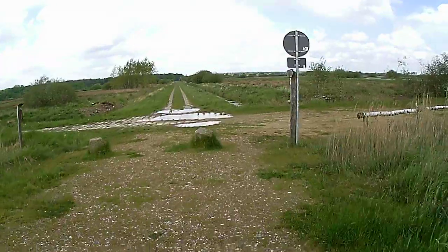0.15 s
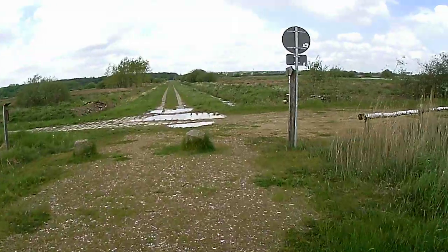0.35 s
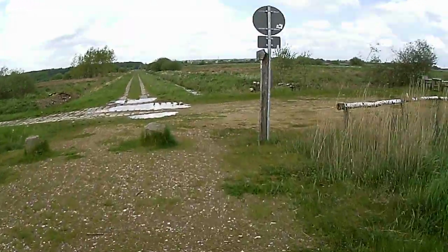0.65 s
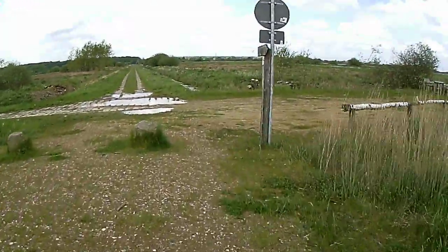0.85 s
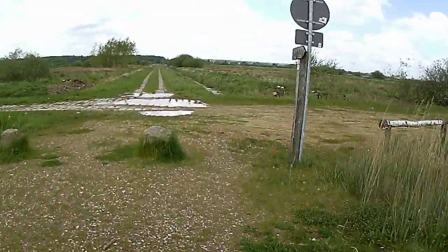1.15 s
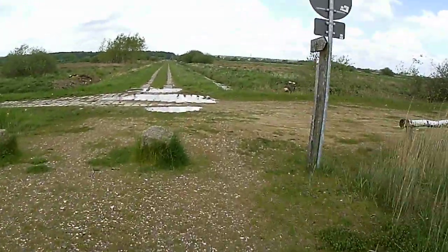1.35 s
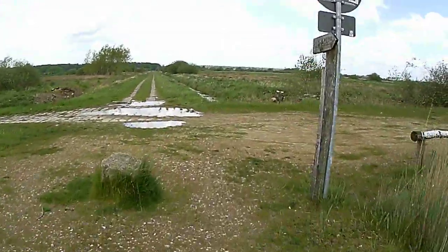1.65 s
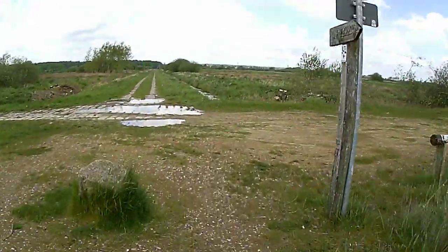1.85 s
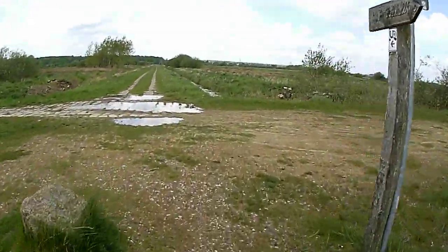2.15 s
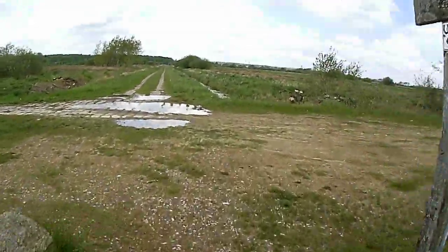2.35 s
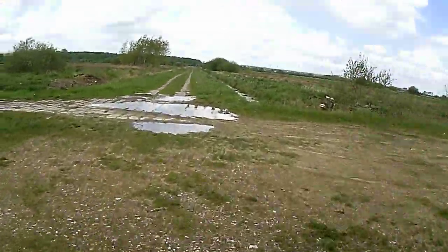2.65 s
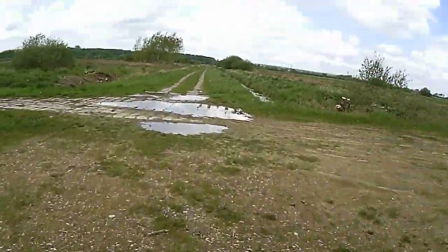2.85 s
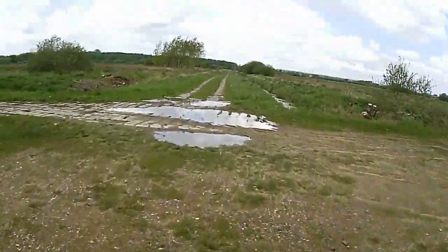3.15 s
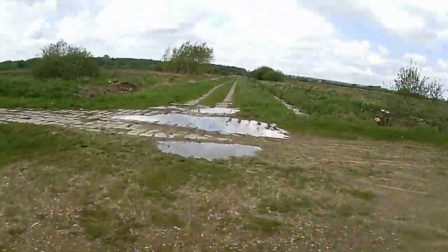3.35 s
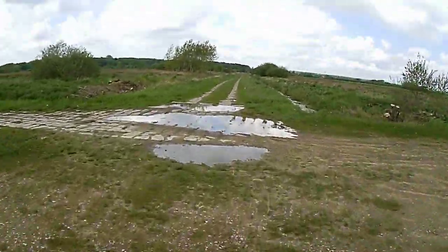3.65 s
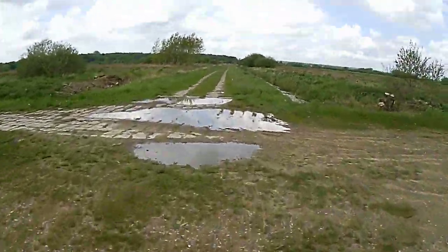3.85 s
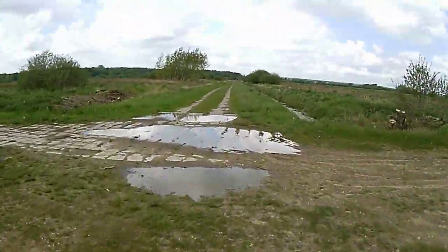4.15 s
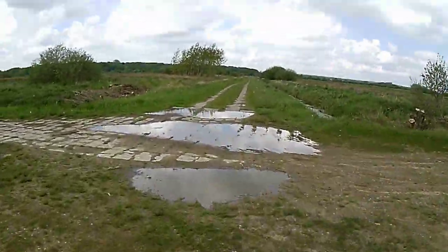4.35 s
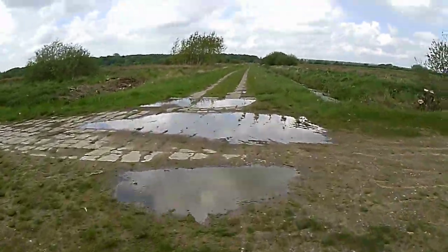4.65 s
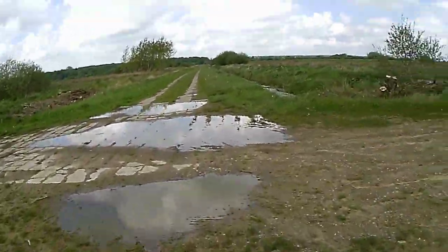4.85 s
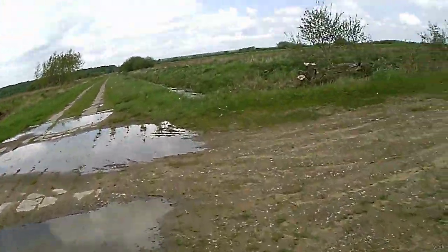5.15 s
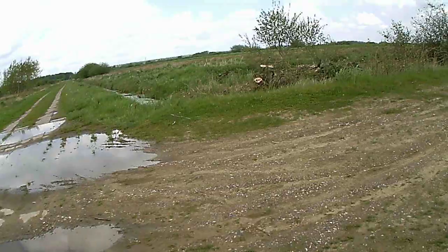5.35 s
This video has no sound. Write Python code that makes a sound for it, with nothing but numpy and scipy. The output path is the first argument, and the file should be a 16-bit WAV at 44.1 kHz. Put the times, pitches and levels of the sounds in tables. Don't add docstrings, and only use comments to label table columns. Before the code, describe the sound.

From 0 to 1.4 s a bicycle rolls on gravel: a strong uneven hum near 65-70 Hz swells with each bump, over quiet gritty tyre crunch, with clamp creaks, sharp metallic grit ticks and duller stone snaps, densest around 0.8-1.2 s. A rough pad drag creeps in after 1.1 s. At about 1.45 s the brake grabs: a loud, buzzing squeal near 1 kHz, chopped into irregular short grips and longer cries around 1.8, 2.35 and 2.5-2.7 s, dipping briefly in pitch near 1.9 and 2.1 s. Dull knocks and bright clacks chatter rapidly, especially 2.15-2.35 s. Grips continue to 3.45 s, then become short chirps and swells, clustered at 3.8-4.2 and 4.4-4.5 s, weak after 4.75 s and gone by about 5.3 s. Rattles and hum persist to 5.5 s; low wind buffets stand out near 3.95 and 5.2 s. Close, dry, overloaded outdoor sound.

```python
import sys
import numpy as np
from scipy import signal
from scipy.fft import rfft, irfft
from scipy.io import wavfile
from scipy.ndimage import uniform_filter1d

SR = 44100
rng = np.random.default_rng(int(sys.argv[2]) if len(sys.argv) > 2 else 0)


def how_loud(loudness_db):
    steps = np.asarray(loudness_db, float) / 20
    return 10 ** steps


def unload_audio(sound):
    columns = np.transpose(np.atleast_2d(sound))
    steps = np.round(np.clip(columns, -1, 1) * 32767)
    wavfile.write(sys.argv[1], SR, steps.astype(np.int16))


N = 242991
T = np.arange(N) / SR

# widest swing in seconds, level in dB, length in seconds.
BUMPS = [(.09, -17.5, 0.22), (.31, -17, 0.22), (.46, -16, .12), (.62, -18, 0.17), (.73, -15, 0.13),
         (.88, -19, .18), (1.02, -16.5, 0.18), (1.16, -21.5, 0.21), (1.3, -21.5, 0.16), (1.43, -19, 0.16),
         (1.55, -21.5, 0.18), (1.78, -20.5, 0.2), (2.03, -19.5, 0.091), (2.28, -17, 0.32),
         (2.85, -29, 0.15), (3.22, -20.5, 0.071), (3.45, -22.5, 0.13), (3.6, -17.5, 0.044),
         (3.7, -23, 0.26), (3.82, -20, 0.24), (4.33, -20.5, 0.33), (4.68, -27, 0.12), (4.78, -23.5, 0.11),
         (4.93, -20, 0.26), (5.18, -23.5, 0.2), (5.37, -19.5, 0.29), (5.49, -21, 0.25)]
# peak in seconds, level in dB, length in seconds.
GUSTS = [(0.01, -26.5, 0.045), (.62, -37.5, 0.36), (.77, -31.5, 0.1), (1.2, -31, 0.052), (1.8, -51, 0.22),
         (2.27, -36, 0.24), (2.75, -48, 0.51), (3.6, -32, 0.5), (3.95, -26, 0.34), (4.4, -33.5, 0.18),
         (4.75, -39, 0.19), (5.17, -22, 0.39), (5.31, -25.5, 0.21), (5.47, -33.5, 0.11)]
# frequency in Hz, density in dB per Hz.
WIND_COLOUR = [(53, -29.5), (90, -5.5), (184, 2.5), (290, -1.5), (446, -9), (800, -20), (1040, -48.5),
               (1760, -120)]
# time in seconds, level in dB.
LOAD = [(0, -51.5), (.25, -57.5), (.8, -51.5), (1.4, -51.5), (2.1, -46.5), (3.0, -50), (4.4, -48),
        (4.9, -50.5), (5.2, -50.5), (5.51, -50)]
# frequency in Hz, density in dB per Hz.
TYRE_COLOUR = [(240, -37), (400, 1.5), (839, 6), (1900, -5), (2180, -16.5), (2930, -8.5), (3750, -20.5),
               (6000, -27.5), (16000, -61)]
# centre in Hz, width in Hz, level in dB.
WHINE = [(8400, 60, -82), (9550, 60, -73)]
# start in seconds, peak in dB.
CREAKS = [(.0235, -29.5), (.053, -26), (.071, -33), (.107, -41), (.195, -49), (.302, -40), (.316, -32),
          (.34, -40), (.441, -44), (.455, -27), (.478, -45), (.535, -51), (.585, -30.5), (.616, -37),
          (.637, -40), (.751, -43), (.805, -49), (.847, -35), (.884, -51), (.958, -56), (.9955, -18),
          (1.113, -34), (1.25, -27.5), (1.369, -33)]
# frequency in Hz, density in dB per Hz.
CREAK_COLOUR = [(500, -30), (1500, 4), (2300, -3.5), (3000, 5.5), (3800, -6), (4800, -5.5), (7000, -11.5),
                (10000, -22)]
# start in seconds, peak in dB.
TICKS = [(0.159, -21), (0.2657, -17), (0.315, -43), (0.5498, -19.5), (0.6942, -38), (0.7845, -18),
         (0.818, -19.5), (0.8543, -17), (0.9134, -20.5), (0.9997, -16), (1.041, -28), (1.0588, -21.5),
         (1.1228, -27), (1.1479, -22), (1.1902, -24.5), (1.2664, -34.5), (1.3138, -35), (1.4064, -36)]
# frequency in Hz, width in Hz, level in dB.
TUBE = [(1640, 156, 1.5), (2900, 530, -3.5), (4070, 140, -9), (4780, 160, -3), (5160, 230, -14),
        (6670, 800, 0.5), (8150, 280, -16), (9500, 360, -1.5), (10600, 510, -6), (12400, 410, -5),
        (13700, 460, -24), (14700, 400, -25)]
# start in seconds, peak in dB, pitch in Hz.
STONES = [(0.16, -40, 1520), (0.267, -29.5, 1230), (0.549, -36, 1190), (0.696, -25, 840), (0.752, -46, 657),
          (0.772, -22, 834), (0.836, -37, 1945), (0.854, -28, 810), (0.889, -29.5, 1840),
          (0.904, -31, 1940), (0.976, -28.5, 2900), (1.198, -29, 2320), (0.975, -23, 650),
          (0.992, -18.5, 930), (1.145, -35, 1230), (1.194, -21, 840)]
# start in seconds, peak in dB, pitch in Hz.
THUMPS = [
    (.55, -36, 524),
    (0.773, -23, 287),
    (1.195, -33.5, 307),
    (2.859, -36, 319.3),
]
# centre in Hz,
# width in Hz, level in dB.
PAD = [(1720, 325, 6.5), (2443, 220, 1), (4780, 170, -17.5), (9500, 200, -21), (10400, 500, -20.5)]
# frequency in Hz, width in Hz, level in dB.
JOINT = [(3080, 280, -6), (3480, 190, 2), (4600, 500, -12), (5150, 330, -6), (7750, 600, -7)]
# time in seconds, level in dB.
SCRAPE = [(1.44, -46.5), (1.47, -22.5), (2.3, -28), (2.8, -28.5), (3.1, -25.5), (3.73, -33.5), (4.0, -33.5),
          (4.2, -33), (4.4, -33), (4.65, -36), (5.0, -37.5), (5.2, -41), (5.3, -63.5)]
# start and length in seconds, level in dB,
# rise over the grip in dB, pitch in Hz.
GRIPS = [(1.448, 0.024, -18, 9, 1076), (1.462, 0.025, -7, 5.5, 1008), (1.497, 0.012, -18, -2.5, 1087),
         (1.526, 0.0089, -24, 1, 1092), (1.536, 0.036, -14.5, -7.5, 1102), (1.567, 0.079, -5, 7, 1006),
         (1.667, 0.012, -12.5, 6, 1001), (1.688, 0.02, -10.5, -4.5, 1065), (1.711, 0.022, -7.5, -3, 1014),
         (1.741, 0.022, -12, -1.5, 1039), (1.768, 0.015, -15.5, -3.5, 1062), (1.788, 0.12, -1.5, 9.5, 999),
         (1.938, 0.0062, -16, -1.5, 1070), (1.952, 0.011, -21, -2, 1083), (1.975, 0.016, -18.5, 5.5, 1061),
         (1.998, 0.012, -11.5, 2, 1067), (2.018, 0.011, -14, 1.5, 1030), (2.036, 0.016, -2, -0.5, 983),
         (2.062, 0.064, -9, -2, 999), (2.139, 0.047, -8, 7, 1005), (2.196, 0.026, -13, -6.5, 1013),
         (2.281, 0.025, -20.5, -0.5, 1066), (2.339, 0.11, -5, 6.5, 998.4), (2.451, 0.049, -14.5, -8, 1008),
         (2.489, .22, -5, 4, 994.7), (2.715, 0.021, -14.5, -4, 993.5), (2.845, .03, -9, 2, 998),
         (2.878, 0.072, -10.5, -1, 995), (2.952, 0.024, -10, 4.5, 977.5), (2.978, 0.04, -11, -3, 1002),
         (3.02, 0.019, -11.5, 2.5, 992), (3.086, 0.017, -22, -2.5, 1030), (3.118, 0.031, -23, -7, 1066),
         (3.193, 0.055, -8.5, 3.5, 1001), (3.25, 0.056, -14.5, 1, 1015), (3.302, 0.048, -15.5, 4.5, 1009),
         (3.353, 0.049, -10, -1, 999), (3.406, 0.031, -10.5, -11.5, 996), (3.434, 0.018, -22.5, -4.5, 1012)]
# start, rise and fall in seconds,
# peak in dB, pitch in Hz.
BRUSHES = [(3.465, 0.026, 0.032, -12.5, 1022), (3.501, 0.0358, 0.0419, -7.5, 1028),
           (3.6, 0.012, 0.0358, -12.5, 1013), (3.762, 0.024, 0.019, -26, 1027),
           (3.815, 0.017, 0.013, -8.5, 999), (3.832, .012, 0.011, -7.5, 1017), (3.851, .01, .014, -7, 1010),
           (3.868, 0.017, .012, -7, 1013), (3.895, 0.024, 0.0096, -14.5, 1032),
           (3.926, .012, 0.0099, -12, 1013), (3.96, 0.0087, 0.0062, -22.5, 1000),
           (3.985, 0.013, 0.017, -29, 1076), (4.049, .007, 0.013, -19, 1078),
           (4.026, 0.011, 0.0055, -12, 1050), (4.088, 0.024, 0.013, -14.5, 1040),
           (4.127, 0.017, 0.033, -6, 1023), (4.174, 0.013, .012, -12.5, 1031),
           (4.424, .008, 0.012, -10, 1025), (4.44, .014, 0.03, -6, 1022), (4.478, 0.013, 0.014, -12, 1021),
           (4.21, 0.012, 0.027, -26, 1036), (4.33, 0.013, 0.029, -31, 1048),
           (4.511, 0.0088, 0.045, -14, 1025), (4.56, 0.0086, 0.044, -24.5, 1042),
           (4.653, 0.0085, 0.013, -23.5, 1028), (4.82, 0.0093, 0.0054, -27.5, 1035),
           (4.721, 0.026, 0.0759, -10, 1023), (4.846, 0.011, 0.055, -24, 1044),
           (4.912, 0.0098, 0.0071, -23, 1004), (5.018, 0.008, 0.022, -23, 1060),
           (5.05, 0.0073, .015, -29.5, 1050), (5.102, 0.0076, 0.015, -26.5, 1059),
           (5.122, 0.041, 0.033, -19, 1049), (5.19, 0.0065, .03, -33, 1050)]
# centre in seconds,
# low mode in dB, sag in Hz, spread in seconds.
BITES = [
    (1.646, -26, 14.3, 0.021),
    (1.911, -13.5, 70.7, 0.015),
    (2.087, -43, 49.5, 0.019),
    (2.462, -32, 7.33, 0.0431),
    (2.726, -23.5, 8.7, 0.025),
]
# level in dB, growth as a power of the swing.
BUZZ = [(-18, 1.19), (-23.5, 1.026), (-26, 2.86), (-28.5, 1.4), (-33.5, 2.3), (-39, 1.9)]
# frequency in Hz, density in dB per Hz.
RUB_COLOUR = [(1200, -34.5), (2500, 8), (4000, 11), (6000, -9), (9000, -41), (12000, -45.5), (16000, -79)]
# time in seconds, peak in dB.
UPPER = [(1.5958, -3), (1.684, -8), (1.7062, -13), (1.7385, -5.5), (1.7523, -10), (1.7669, 0), (1.7841, 2),
         (1.8117, 1), (1.857, -4), (1.9671, -14), (2.0196, -2), (2.0321, -7.5), (2.1531, -3),
         (2.1695, -1.5), (2.2, -5), (2.2142, 2), (2.2309, 5.5), (2.2447, 2), (2.2591, -3), (2.2741, 4.5),
         (2.2901, 1.5), (2.3038, 3), (2.3207, 0.5), (2.3339, -1), (2.346, -18), (2.3633, -1), (2.3758, -8),
         (2.4545, -3.5), (2.467, -9), (2.479, -8), (2.5, -5), (2.515, -9), (2.528, -10), (2.5412, -12),
         (2.5696, -2.5), (2.5857, -3.5), (2.6, -5), (2.6147, -4), (2.627, -5), (2.6406, -6), (2.7, -11),
         (2.7745, -16)]
# time in seconds, peak in dB.
UPPER_MIDDLE = [(2.863, 5), (2.8886, -12), (2.9029, -15), (2.934, -1.5), (2.961, -14), (2.979, -11),
                (3.0397, -15.5), (3.1279, -22), (3.2392, -15), (3.259, -13), (3.2876, -15), (3.3276, -4),
                (3.367, -3), (3.3828, -5), (3.3944, -6), (3.4118, 3), (3.4262, -8), (3.4412, -2),
                (3.4544, -5.5), (3.4692, -2), (3.5282, -14), (3.5927, -11), (3.6076, -7), (3.6206, -7.5),
                (3.638, -15), (3.651, -16), (3.6672, -30), (3.745, -7), (3.7585, -8), (3.7741, -3),
                (3.7875, -12), (3.833, -5)]
# time in seconds, peak in dB.
UPPER_LATE = [(3.935, -13.5), (4.1387, -11), (4.154, -13), (4.2, -15.5), (4.233, -14), (4.245, -13),
              (4.2598, 1), (4.2761, -4), (4.3058, -6), (4.32, -8), (4.3349, -6), (4.3489, -16),
              (4.363, -11), (4.3919, -6), (4.43, -17), (4.5347, -9), (4.742, -12.5), (4.8435, -14),
              (4.8582, -6), (4.878, -11), (4.8922, -15), (4.9085, -15), (4.921, -5.5), (4.9355, -12),
              (4.951, -7.5), (4.98, -16), (5.1633, -14), (5.3046, -14.5), (5.334, -8), (5.379, -11),
              (5.4, -5.5), (5.41, -16), (5.431, -14), (5.4695, -14.5)]
# time in seconds, peak in dB.
LOWER = [(1.4692, -7), (1.4849, 2), (1.5054, -23), (1.5173, -5.5), (1.53, -14), (1.573, -9), (1.5893, -1.5),
         (1.7603, -4.5), (1.7765, -5), (1.8799, -13), (1.898, -10), (2.0403, -13), (2.1015, -13),
         (2.1097, -10), (2.1618, -6), (2.1812, -11), (2.189, -7), (2.192, -6), (2.2068, -2), (2.221, -5),
         (2.2363, -6), (2.2539, 1), (2.2696, -2), (2.2819, -12), (2.2957, -15), (2.313, -1), (2.3272, -1),
         (2.371, -8), (2.4169, -3.5), (2.652, -7), (2.7093, -0.5), (2.7832, -21), (2.9138, -15),
         (2.922, -14), (2.9278, -3.5), (2.9715, -8.5), (3.206, -20), (3.2673, -6), (3.3181, -8),
         (3.345, -8.5), (3.3883, -3), (3.4034, -4), (3.4303, -6), (3.4622, -5.5)]
# time in seconds, peak in dB.
LOWER_LATE = [(3.6758, -21), (3.725, -13), (3.7381, -24), (3.769, -6), (3.7826, -9), (3.8281, -11.5),
              (3.8737, -4.5), (4.038, -21), (4.2523, -7), (4.2674, 3.5), (4.3137, -8), (4.331, -15),
              (4.3413, -17), (4.355, -11), (4.3711, -17), (4.3872, -1.5), (4.4015, -9), (4.4075, -14),
              (4.4505, -14.5), (4.6724, -12), (4.686, -8), (4.7668, -12), (4.781, -12), (4.7941, -8.5),
              (4.8519, -2.5), (4.8702, -6), (4.8831, 0), (4.8987, -9), (4.9158, -4), (4.9294, -10),
              (4.986, -19), (5.1548, -16), (5.325, -4), (5.3553, -16), (5.3712, -7.5), (5.3882, -2)]
UPPER_TILT_DB = [-4.5, 1, 0.5, -10, -7]
LOWER_TILT_DB = [2, -0.5, 7, 7.5, 1.5]


def evened(x):
    return x / np.sqrt(np.mean(x ** 2) + 1e-20)


def curves(rows, t):
    s, *columns = np.transpose(rows)
    return [np.interp(t, s, c) for c in columns]


def coloured(x, points):
    f, db = np.transpose(points)
    hz = np.fft.rfftfreq(len(x), 1 / SR)
    gain = how_loud(np.interp(np.log(hz + 1), np.log(f + 1), db))
    return evened(irfft(rfft(x) * gain, len(x)))


def wobble(hz, size=N):
    return evened(signal.lfilter(*signal.butter(2, 2 * hz / SR), rng.standard_normal(size)))


def resonate(x, hz, width):
    turn = np.exp(2j * np.pi * np.cumsum(hz * np.ones(len(x))) / SR)
    r = np.exp(-np.pi * width / SR)
    return 2 * (turn * signal.lfilter([1 - r], [1, -r], x / turn + 1e-18)).real


def noise_band(hz, width):
    first, second = np.broadcast_to(width, 2)
    return evened(resonate(resonate(rng.standard_normal(N), hz, first), hz, second))


def place(events, sounds):
    out = np.zeros(N)
    for (s, db, *_), sound in zip(events, sounds):
        part = out[round(s * SR):][:len(sound)]
        part += how_loud(db) * sound[:len(part)] / abs(sound).max()
    return out


def swells(rows, rest_db):
    power = how_loud(2 * rest_db)
    for s, db, length in rows:
        power = power + how_loud(2 * db) * np.cos(np.pi * np.clip((T - s) / length, -.5, .5)) ** 2
    return 10 * np.log10(power)


def paced(turns):
    upper_turn, lower_turn, firm_db = -.07, .44, -14
    stops = [(s, upper_turn) for s, db in UPPER + UPPER_MIDDLE + UPPER_LATE if db > firm_db]
    stops += [(s, lower_turn) for s, db in LOWER + LOWER_LATE if db > firm_db]
    nudges = [(0, 0)]
    for s, turn in sorted(stops):
        last_s, last_nudge = nudges[-1]
        miss = (turn - turns[round(s * SR)] - last_nudge + .5) % 1 - .5
        if abs(miss) < 25 * (s - last_s):
            nudges.append((s, last_nudge + miss))
    return turns + uniform_filter1d(curves(nudges, T)[0], size=200)


def mount():
    rest_db, rest_hz, sag_hz_per_db = -29.5, 68.8, 0.19
    db = swells(BUMPS, rest_db)
    hz = rest_hz - sag_hz_per_db * (db - rest_db)
    turns = paced(np.cumsum(hz + 4.64 * wobble(18.0)) / SR)
    swing = np.sqrt(2) * np.sin(2 * np.pi * turns)
    jolts = noise_band(hz, (23.0, 31.0))
    hum = how_loud(db) * (0.77 * swing * how_loud(1.3 * wobble(21.0)) + 0.23 * jolts)
    sway = how_loud(-30.5) * evened(resonate(resonate(rng.standard_normal(N), 61.3, 36.0), 40., 80.))

    strain = np.clip(abs(hum) / 0.35, 0, 1) ** 2.0
    sizes = how_loud(1.2 * np.minimum(rng.exponential(1, N), 3))
    snaps = rng.standard_normal(N) * sizes * (rng.random(N) < 700. * strain / SR)
    burst = np.exp(-np.arange(40) / 20.0) * rng.standard_normal(40)
    creak = coloured(np.convolve(snaps, burst)[:N], CREAK_COLOUR)
    return hum + sway + how_loud(-59) * creak


def wind():
    gust_db = swells(GUSTS, -39.5)
    gusts = coloured(rng.standard_normal(N), WIND_COLOUR) * how_loud(gust_db - 3.0 + 1.86 * wobble(27.0))
    return gusts + 3.0 * (gusts ** 2 - uniform_filter1d(gusts ** 2, size=1000))


def tyre():
    sizes = how_loud(2.8 * np.minimum(rng.exponential(1, N), 5))
    grains = rng.choice([-1., 1.], N) * sizes * (rng.random(N) < 2200. / SR)
    crush = coloured(evened(grains) + 0.53 * rng.standard_normal(N), TYRE_COLOUR)
    return crush * how_loud(curves(LOAD, T)[0] + 7.5 + 4.03 * wobble(18.0))


def hiss():
    white = rng.standard_normal(N)
    bands = sum(how_loud(db) * evened(resonate(white, hz, width)) for hz, width, db in WHINE)
    return how_loud(-65.0) * coloured(white, [(0, 1), (14000, -5), (15200, -2.5), (22050, -12)]) + bands


def creaks():
    t = np.arange(700) / SR
    chances = rng.standard_normal((len(CREAKS), 700))
    return place(CREAKS, [coloured(c, CREAK_COLOUR) * np.exp(-t / 0.0018) for c in chances])


def ticks():
    t = np.arange(700) / SR
    sounds = []
    for chance in rng.standard_normal((len(TICKS), 700)):
        blow = (t == 0) + .035 * chance * np.exp(-t / 0.0016)
        modes = [how_loud(db) * resonate(blow, hz, width) / np.sqrt(width) for hz, width, db in TUBE]
        sounds.append(sum(modes))
    return how_loud(7.0) * place(TICKS, sounds)


def stones():
    t = np.arange(700) / SR
    sounds = []
    for chance, (_, _, hz) in zip(rng.standard_normal((len(STONES), 700)), STONES):
        snap = chance * t * np.exp(-t / 0.0021)
        sounds.append(resonate(resonate(snap, hz, 1100.0), hz, 1400.0))
    return how_loud(-1.0) * place(STONES, sounds)


def thumps():
    t = np.arange(2500) / SR
    return place(THUMPS, [np.sin(2 * np.pi * hz * t) * t * np.exp(-t / 0.008) for *_, hz in THUMPS])


def dragging_pad():
    drag = sum(how_loud(db) * noise_band(hz, width) for hz, width, db in PAD)
    return how_loud(curves(LOAD, T)[0]) * np.clip((T - 1.08) / 0.29, 0, 1) * drag


def joint(x, spread_db):
    return sum(how_loud(db + extra_db) * resonate(x, hz, width) / np.sqrt(width)
               for (hz, width, db), extra_db in zip(JOINT, spread_db))


def pressure():
    attack_s, release_s, catch_hz, catch_s = 0.0061, 0.01047, 30.06, .012
    edge_db = -9.5
    power = how_loud(2 * curves(SCRAPE, T)[0])
    pull = power * 1050.
    holds = [(s, length, db, [0, length], [-rise_db / 2, rise_db / 2], hz)
             for s, length, db, rise_db, hz in GRIPS]
    holds += [(s, rise + fall, db, [0, rise, rise + fall], [edge_db, 0, edge_db], hz)
              for s, rise, fall, db, hz in BRUSHES]
    for start, length, db, corners, shape_db, hz in holds:
        span = slice(round((start - .03) * SR), round((start + length + .03) * SR))
        t = T[span] - start
        edges = np.clip(np.minimum(t / attack_s, (length - t) / release_s) + .5, 0, 1) ** 2
        grip = edges * how_loud(2 * (db + np.interp(t, corners, shape_db)))
        power[span] += grip
        pull[span] += grip * (hz + catch_hz * np.exp(-np.maximum(t, 0) / catch_s))
    return 10 * np.log10(power), uniform_filter1d(pull / power, size=400)


def low_mode(bites, sag):
    level = how_loud(-41.5) * (T > 1.55) * (T < 2.85)
    level = level + sum(how_loud(low_db) * bite for (_, low_db, _, _), bite in zip(BITES, bites))
    turns = np.cumsum(840. - 0.393 * sag + 6.9 * wobble(43.0)) / SR
    return level * how_loud(4.6 * wobble(24.0)) * np.exp(2j * np.pi * turns)


def bracket_buzz(swing, hz):
    bend = swing / abs(swing)
    light_db = 0.2 * np.maximum(uniform_filter1d(hz, size=600) - 1044, 0)
    buzz = 0
    for k, (db, power) in enumerate(BUZZ, 2):
        level = how_loud(db - light_db + 3.45 * wobble(87.0))
        buzz = buzz + level * abs(swing) ** power * (bend ** k * np.exp(.5j * wobble(34.0))).imag
    return buzz


def pad_rub(grip, turns, hz):
    pulse = 1.0 + np.exp(-(turns % 1) / 0.19)
    slips = pulse * how_loud(5.0 * wobble(300.0) + 2.3 * wobble(99.0)) * rng.standard_normal(N)
    light_db = 0.3 * np.maximum(hz - 1030., 0)
    noise = coloured(slips, RUB_COLOUR) + 0.63 * evened(joint(slips, np.zeros(len(JOINT))))
    return how_loud(-23.5 - light_db) * grip ** 1.3 * noise


def squeal():
    db, hz = pressure()
    bites = [np.exp(-.5 * ((T - s) / spread) ** 2) for s, _, _, spread in BITES]
    sag = sum(sag_hz * bite for (_, _, sag_hz, _), bite in zip(BITES, bites))
    db = db + 0.6 * sag
    flutter_db = 1.85 * wobble(75.0)
    hz = hz - sag - 2.5 * flutter_db
    on = abs(uniform_filter1d(1. * (T > SCRAPE[0][0]) * (T < SCRAPE[-1][0]), 300))
    grip = 0.56 * np.tanh(on * how_loud(db + flutter_db) / 0.59)
    turns = np.cumsum(hz + 8.85 * wobble(47.8)) / SR

    loose = np.clip(0.015 + .9 / (1 + (grip / 0.035) ** 2), 0, 1)
    fuzz = noise_band(hz, (55.0, 70.0))
    tone = grip * np.sqrt(1 - loose ** 2) * np.exp(2j * np.pi * turns)
    low = low_mode(bites, sag)
    swing = np.sqrt(2) * (tone + low) + 1e-9
    mixed = how_loud(6.5) * (swing * low).real
    mixed = mixed + how_loud(1.5) * (swing ** 2 * (low + 1.6 * low.conj())).real
    buzz = bracket_buzz(swing, hz)
    return swing.real + grip * loose * fuzz + buzz + mixed + pad_rub(grip, turns, hz)


def rattle():
    rows = [(*row, 1) for row in UPPER + UPPER_MIDDLE + UPPER_LATE]
    rows += [(*row, -1) for row in LOWER + LOWER_LATE]
    return [(*row, c) for row, c in zip(sorted(rows), rng.standard_normal((len(rows), 500)))]


def knocks():
    t = np.arange(500) / SR
    sounds, blows = [], rattle()
    for _, db, side, chance in blows:
        chatter, push, tilt_db = (.14, .4, UPPER_TILT_DB) if side > 0 else (.33, -.15, LOWER_TILT_DB)
        blow = chance * (chatter * np.exp(-t / .0006) + .07 * np.exp(-t / .0025)) + side * (t == 0)
        blow = blow + .07 * abs(chance[-9]) * np.roll(blow, round(150 + 30 * chance[-8]))
        edge = signal.lfilter(*signal.butter(2, 2 * 2200.0 / SR), blow)
        thud = signal.lfilter(*signal.butter(1, 2 * 2800.0 / SR), abs(blow))
        ring = joint(blow, np.array(tilt_db) + 1.3 * chance[-len(JOINT):])
        whole = evened(ring) + 0.37 * evened(edge) + push * evened(thud)
        snap = 0.034 * how_loud(0.74 * db) * evened(np.diff(blow, prepend=0))
        housing = signal.butter(3, 2 * (6900.0 + 160.0 * db) / SR)
        sounds.append(snap + signal.lfilter(*housing, whole))
    return how_loud(-6.5) * place(blows, sounds)


def scene():
    around = mount() + wind() + tyre() + hiss()
    struck = creaks() + ticks() + stones() + thumps()
    return (around + struck + dragging_pad() + squeal() + knocks())[None]


def roll_off(x):
    return signal.sosfilt(signal.butter(12, 16400, fs=SR, output="sos"), x)


def record(dry):
    top = np.where(dry > 0, .715, .56)
    limited = dry / (1 + abs(dry / top) ** 6) ** (1 / 6)
    edged = signal.oaconvolve(limited, signal.firwin(255, 15700, fs=SR)[None], "same")
    mix = signal.lfilter(*signal.butter(1, 2 * 20. / SR, "high"), edged)
    return roll_off(mix)


dry = scene()
out = record(dry)
unload_audio(out)
```